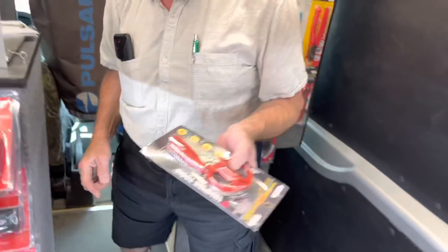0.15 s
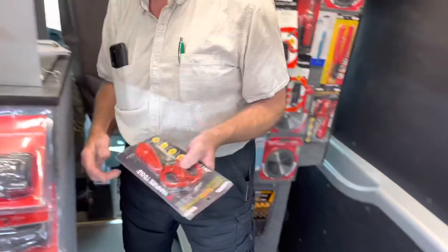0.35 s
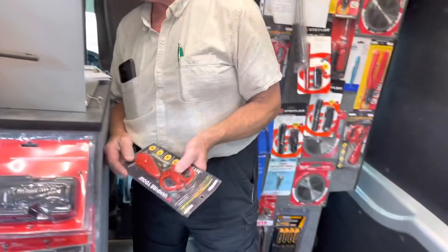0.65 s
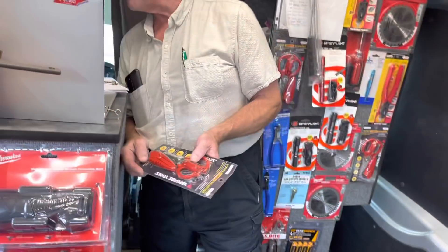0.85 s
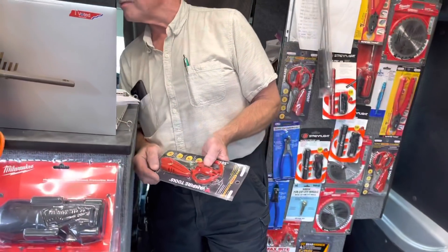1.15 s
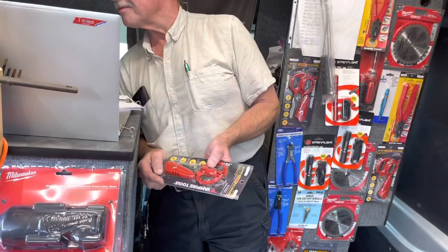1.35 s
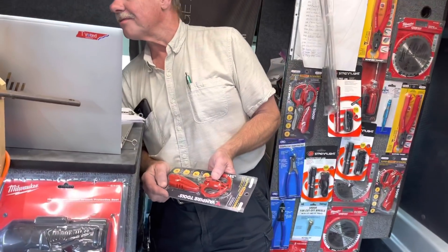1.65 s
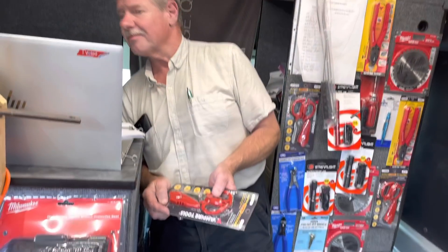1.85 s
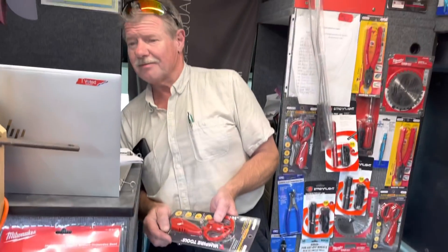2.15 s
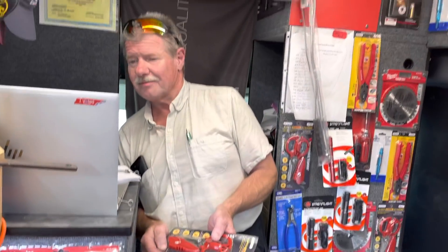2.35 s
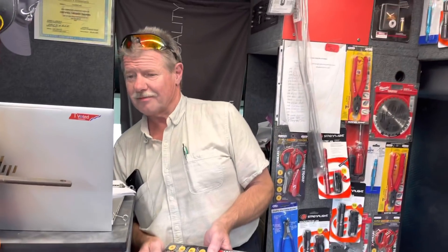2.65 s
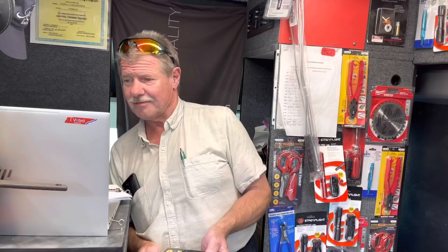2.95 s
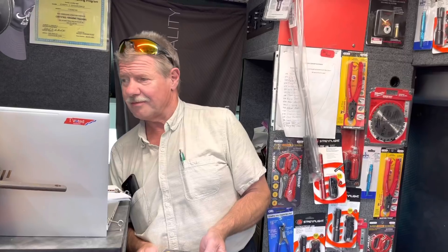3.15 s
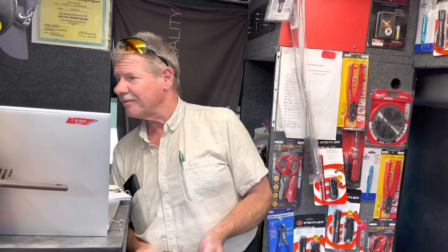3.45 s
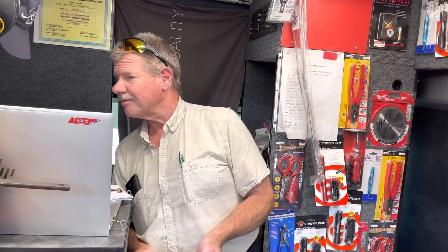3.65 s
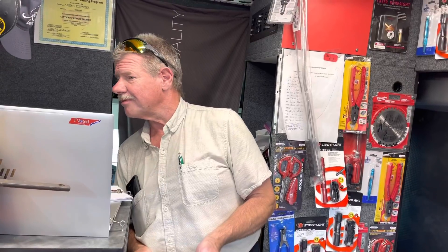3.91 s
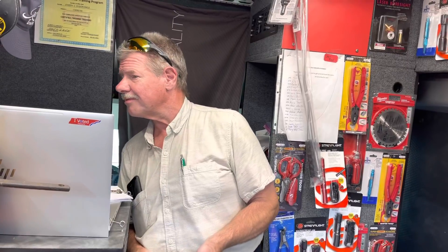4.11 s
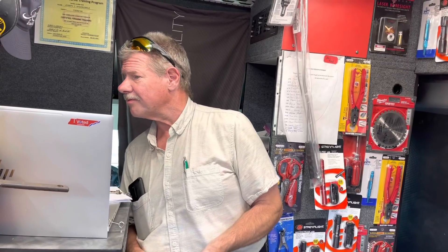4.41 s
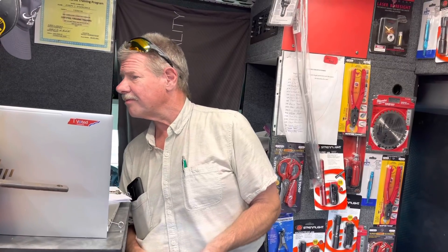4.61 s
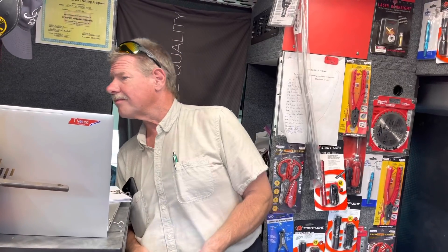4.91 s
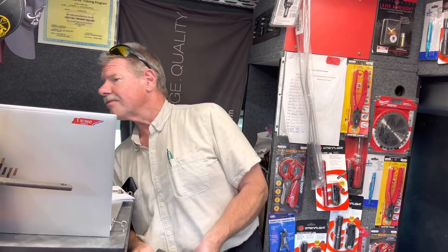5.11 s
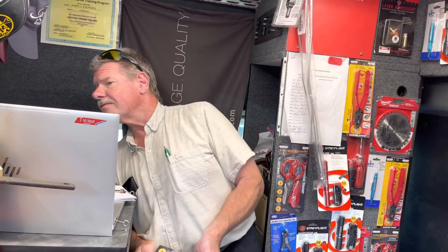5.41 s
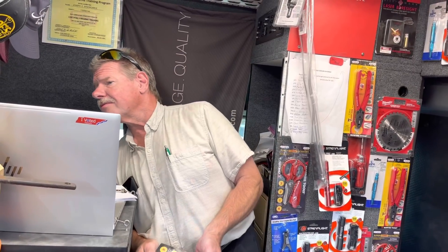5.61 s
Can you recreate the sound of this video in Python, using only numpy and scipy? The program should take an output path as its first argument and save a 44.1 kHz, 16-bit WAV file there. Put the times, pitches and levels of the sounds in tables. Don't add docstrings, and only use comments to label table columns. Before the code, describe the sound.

Low compressor drone with faint whine and boomy blown air in a small cabin; brief plastic snaps and dull knocks early, then mostly steady.

```python
import sys
import numpy as np
from scipy import signal
from scipy.fft import rfft, irfft, next_fast_len
from scipy.io import wavfile
from scipy.ndimage import map_coordinates

SR = 44100
rng = np.random.default_rng(int(sys.argv[2]) if len(sys.argv) > 2 else 0)


def log_audio(samples):
    frames = np.atleast_2d(samples).T
    limited = np.clip(frames, -1, 1)
    pcm = np.round(limited * 32767).astype(np.int16)
    wavfile.write(sys.argv[1], SR, pcm)


def amplitude_ratio(level_db):
    exponent = np.asarray(level_db, float) / 20
    return 10 ** exponent


N = 254456

COMPRESSOR_HZ, FAN_HZ = 57.53, 34.45
MAINS_HZ, MAINS_DB = 60.03, -61.5
BEAT_TOP_S = 0.21
HUM_DB, SWAY_S = -30.5, 0.049
# (time [s], change [dB])
HUM_SWAYS = [(.17, -7.5), (.29, 3.5), (.46, 2), (.64, -5), (.79, -12), (1.08, 4), (1.16, -6), (1.6, -5),
             (1.74, 4.5), (1.86, -2), (2.39, -5.5), (2.58, 3.5), (2.82, -1.5), (3.01, 5.5), (3.32, 3),
             (3.57, -1.5), (3.76, 3.5), (4.0, -1), (4.12, 5.5), (4.23, -4), (4.57, 1.5), (4.68, -10),
             (5.0, 2.5), (5.19, -2)]
# (time [s], pitch [Hz], level [dB])
WHINE_PATH = [(0, 631.8, -53), (1.05, 631.8, -53.5), (1.4, 632.9, -55), (3.2, 632.8, -55),
              (4.3, 632.4, -56.5), (5.77, 632.3, -57.5)]
# (pitch [Hz], level [dB])
SHAFT_TONES = [(27.5, -61.5), (68.9, -55), (103.3, -51.5), (172.4, -60), (206.7, -54.5)]

RUMBLE_DB, DUCT_DB, HISS_DB, SIZZLE_DB, PANEL_DB = -37, -51, -62, -82.5, -43.5
CABIN_HZ, CABIN_WIDTH_HZ, CABIN_DB = 54, 4, -47
TURN_S = 1.5
TURN_DUCT_DB, TURN_HISS_DB, TURN_SIZZLE_DB = -1, 0.5, 12
SIZZLE_TOP_HZ = 9500
# (frequency [Hz], density [dB per Hz])
RUMBLE_COLOUR = [(18, -42.5), (30, -12), (43, -10.5), (53, -1.5), (64, -7.5), (80, 2.5), (98, -6.5),
                 (125, -9.5), (165, -12.5), (205, -10.5), (260, -17.5), (380, -19.5), (520, -26),
                 (900, -30.5)]
# (centre [Hz], width [Hz], level [dB])
DUCT_RESONANCES = [(576, 88, 1), (771.4, 16, 2.5), (951, 71, 2), (1063, 52, 1), (1178, 89, 2),
                   (1304, 75, -0.5), (1397, 67, 2.5), (1600, 640, -3), (1925, 220, -3), (2584, 18, -25),
                   (2843, 39, -9.5), (3840, 40, -18), (5540, 81, -22.5), (6640, 250, -25.5)]
# (frequency [Hz], density [dB per Hz])
HISS_COLOUR = [(900, -40.5), (2200, 3), (3000, -1.5), (4200, -7.5), (6000, -10), (8300, -16), (9600, -22),
               (10200, -21), (10800, -24.5), (11400, -34), (12100, -37.5)]
PANEL_SWING_DB, PANEL_RATE = -0.5, 7.9
SHUDDER_S, BRUSH_S = 0.04, 0.04
# (time [s], extra level [dB])
SHUDDERS = [(.61, 6), (1.03, 9.5), (2.53, 11.5), (2.72, 6), (3.21, 4), (3.62, 7), (4.05, 9), (4.36, 1.5),
            (5.3, 3), (5.54, 7.5)]
# (time [s], extra level [dB])
SLEEVE_BRUSHES = [
    (5.21, 10),
    (5.27, 11),
]

# (frequency [Hz], density [dB per Hz])
EDGE_COLOUR = [(6500, -31), (8200, -11), (9200, -8), (9700, -6), (10200, -6), (10800, -6), (11200, -12),
               (11500, -36)]
# (frequency [Hz], density [dB per Hz])
SHEEN_COLOUR = [(2500, -34), (3800, 4), (5500, 3.5), (6500, 0.5), (8000, -0.5), (9000, -27)]
# (frequency [Hz], density [dB per Hz])
BODY_COLOUR = [(400, -16), (900, -6), (1250, 0), (1700, 0), (2100, -1), (2800, -5), (3600, -17),
               (6000, -32)]
SNAP_RISE_S = 0.0035
STROKE_RISE = 0.52
# (time [s], edge [dB], fall [s], sheen over edge
# [dB], body over edge [dB])
SNAPS = [(0, -61.5, 0.0022, 13, 20.5), (.1075, -80, 0.0063, 4, 31), (0.475, -54.5, 0.014, 1, -1),
         (0.525, -63, 0.0037, 3, 21), (0.535, -61.5, 0.012, 8, 12), (1.313, -68, 0.012, 6, 8),
         (1.325, -72, .008, 3, 1), (4.16, -72, 0.013, -10, -18), (4.519, -64.5, 0.005, -4, -2),
         (4.528, -66, .006, -5, -14), (4.541, -70, .004, -6, -14)]
# (time [s], edge [dB], fall [s], sheen over edge [dB], body over edge [dB])
STROKES = [
    (.3, -78.5, 0.14, 11, 9.5),
    (0.493, -51, 0.02, -1, 5.5),
    (.87, -61.5, 0.1, 1.5, 4.5),
    (5.225, -76.5, 0.07, 9.5, 17.5),
]

KNOCK_PAN_DB = 2
# (time [s], peak [dB], extra for a harder contact [dB per octave])
KNOCKS = [
    (.1063, -20.5, 0),
    (.533, -33, 7),
    (1.243, -31, 4.5),
]
# (pitch [Hz], level [dB], time to fall 60 dB [s])
SHELF_MODES = [(204, -3.5, .1), (280, 3, 0.057), (334, -6.5, 0.033), (550, -13, .07), (1110, -16, .05),
               (1384, -18, .04), (1650, -16, .04), (1880, -23, 0.036)]
SAG, SAG_S, SAG_TOP_HZ = 0.4, 0.014, 450
# (time [s], pitch [Hz], peak [dB], time to fall 60 dB [s])
PINGS = [(.1065, 1470, -50, .045), (.111, 1750, -53, .02), (.469, 10900, -53, .04), (.470, 9000, -49, .04),
         (.475, 1500, -49, .03), (.481, 1650, -48, .04), (.483, 2500, -52, .02), (.487, 9500, -45, .04),
         (.488, 5400, -50, .02), (.491, 10800, -48, .06), (.4915, 2700, -44, .035), (.494, 5450, -46, .03),
         (.494, 7500, -51, .03), (.496, 1320, -46, .04), (.497, 9400, -48, .03), (.504, 1490, -46, .03),
         (.516, 11000, -53, .08), (.5235, 1960, -41, .035), (.531, 5800, -51, .02), (.532, 3400, -48, .03),
         (.5365, 646, -41, .03), (1.312, 9250, -52, .05), (1.313, 8500, -57, .07), (1.317, 6500, -58, .03),
         (1.321, 8950, -53, .07), (1.324, 5700, -57, .03), (4.158, 10850, -60, .06),
         (4.162, 10000, -59, .1), (4.518, 5750, -57, .08), (4.527, 8700, -58, .03), (5.19, 5300, -63, .08),
         (5.239, 2500, -56, .1), (5.25, 3700, -62, .06)]
PING_SPREAD, PING_SPREAD_HZ = 0.05, 190

NEAR = 0.66
# (frequency [Hz], likeness [0-1])
LIKENESS = [(60, 0.99), (250, 0.93), (600, 0.7), (900, 0.5), (1500, 0.29), (3000, 0.91), (5200, 0.25),
            (6200, 0.8), (7200, 0.6), (8000, .7), (8300, 1), (8900, 1), (9300, .9), (10300, .98),
            (11400, .9)]
# (frequency [Hz], left minus right [dB])
LEFT_LOUDER = [(30, -.3), (200, -.1), (350, .5), (650, -1), (1000, 0), (1400, 7), (1750, 3), (2300, 2),
               (5000, 6), (6200, 2.5), (7100, 5.5), (8250, 0), (12000, 0)]
# (frequency [Hz], lead of the left [radians])
LEFT_LEAD = [(0, 0), (350, .2), (700, .8), (1300, 0), (1650, -3), (2300, -4.9), (3050, -4.5), (3700, -5.6),
             (6800, -6.1), (7400, -5.3), (8350, -6.28), (8900, -6.4), (9750, -9), (10000, -9.4),
             (10600, -9.6), (10950, -10.3), (11500, -12.56)]
# (frequency [Hz], extra lead of the left [radians])
HANDS_LEAD = [(1300, 0), (1650, 4.2), (2300, 6), (3050, 5.7), (3700, 6.7), (6500, 7.2), (7400, 6.28),
              (8600, 6.9), (9600, 6.28), (10700, 5.5), (11400, 7.3)]
STOP_S = 0.004


def unit(x):
    return x / np.sqrt(np.mean(x ** 2) + 1e-20)


def along(points, hz):
    f, values = np.transpose(points)
    return np.interp(np.log(hz + 1), np.log(f + 1), values)


def curves(rows):
    times, *columns = np.transpose(rows)
    return [np.interp(np.arange(N) / SR, times, column) for column in columns]


def swells(rows, half_s):
    t = np.arange(N) / SR
    return sum(db * np.exp(-((t - s) / half_s) ** 2) for s, db in rows)


def wobble(rate):
    knots = rng.standard_normal(8000)
    return map_coordinates(knots, [np.arange(N) * rate / SR], mode="wrap")


def filtered(x, response):
    size = next_fast_len(N + SR // 2)
    spectrum = rfft(x, size) * response(np.fft.rfftfreq(size, 1 / SR))
    return irfft(spectrum, size)[..., :N]


def shaped(colour):
    closed = [(colour[0][0] / 2, -120), *colour, (colour[-1][0] * 2, -70)]
    return lambda hz: amplitude_ratio(along(closed, hz))


def tone(hz, drift=0):
    phase = 2 * np.pi * np.cumsum(np.broadcast_to(hz, N)) / SR
    return np.sqrt(2) * np.sin(phase + drift)


def rush(gain, least=0):
    def middle_and_side(hz):
        turn = np.arccos(np.clip(along(LIKENESS, hz), least, 1)) / 2
        return gain(hz) * np.array([np.cos(turn), np.sin(turn)])
    mid, side = filtered(rng.standard_normal((2, N)), middle_and_side)
    return unit(np.array([mid + side, mid - side]))


def machine():
    hum_db = HUM_DB + swells(HUM_SWAYS, SWAY_S)
    whine_hz, whine_db = curves(WHINE_PATH)
    hum = amplitude_ratio(hum_db) * tone(COMPRESSOR_HZ, 0.25 * wobble(2.1))
    mains_start = 2 * np.pi * (COMPRESSOR_HZ - MAINS_HZ) * BEAT_TOP_S
    mains = amplitude_ratio(MAINS_DB) * tone(MAINS_HZ, mains_start)
    fan = amplitude_ratio(-41.0 + 0.38 * wobble(4.5)) * tone(FAN_HZ, 0.08 * wobble(3.2))
    whine = amplitude_ratio(whine_db + 0.18 * wobble(15)) * tone(whine_hz, 0.1 * wobble(5.3))
    lines = sum(amplitude_ratio(db) * tone(hz, 0.051 * wobble(0.66)) for hz, db in SHAFT_TONES)
    return hum + mains + fan + lines + whine * amplitude_ratio([[-0.7], [0.7]])


def air():
    facing = np.exp(-np.arange(N) / SR / TURN_S)

    def duct(hz):
        return np.sqrt(sum(amplitude_ratio(db) ** 2 / (1 + (2 * (hz - centre) / width) ** 4)
                           for centre, width, db in DUCT_RESONANCES))

    def panel(hz):
        return 1 / (1 + ((hz - 119) / 25) ** 4)

    def cabin_mode(hz):
        return 1 / (1 + ((hz - CABIN_HZ) / CABIN_WIDTH_HZ) ** 2)

    def sizzle_colour(hz):
        return shaped(EDGE_COLOUR)(hz) / (1 + (hz / SIZZLE_TOP_HZ) ** 20)

    panel_db = PANEL_DB + swells(SHUDDERS, SHUDDER_S) + PANEL_SWING_DB * wobble(PANEL_RATE)
    sizzle_db = SIZZLE_DB + TURN_SIZZLE_DB * facing + swells(SLEEVE_BRUSHES, BRUSH_S)
    rumble = amplitude_ratio(RUMBLE_DB + 0.65 * wobble(3.56)) * rush(shaped(RUMBLE_COLOUR))
    stream = amplitude_ratio(DUCT_DB + TURN_DUCT_DB * facing + 0.25 * wobble(4.3)) * rush(duct)
    panels = amplitude_ratio(panel_db) * rush(panel)
    cabin = amplitude_ratio(CABIN_DB) * rush(cabin_mode)
    sizzle = amplitude_ratio(sizzle_db) * rush(sizzle_colour)
    hiss = amplitude_ratio(HISS_DB + TURN_HISS_DB * facing + 0.6 * wobble(8)) * rush(shaped(HISS_COLOUR))
    return rumble + cabin + panels + stream + sizzle + hiss


def rustles():
    t = np.arange(N) / SR
    grain = np.array([wobble(700), wobble(500), wobble(350)])
    layers = np.zeros((3, N))
    moves = [(SNAP_RISE_S, *row) for row in SNAPS]
    moves += [(STROKE_RISE * row[2], *row) for row in STROKES]
    for rise, s, db, fall, sheen_db, body_db in moves:
        fade = np.where(t < s, ((t - s) / rise) ** 2, np.abs((t - s) / fall) ** 1.6)
        crackle = amplitude_ratio(grain * 3 / (1 + fall / 0.03))
        tail = amplitude_ratio(-19 - 60 * np.abs(t - s) / 0.32) * (t > s)
        level = amplitude_ratio(db + np.array([[0], [sheen_db], [body_db]]))
        layers += level * (np.exp(-fade) * crackle + tail)
    colours = (EDGE_COLOUR, SHEEN_COLOUR, BODY_COLOUR)
    return sum(level * rush(shaped(colour), NEAR) for level, colour in zip(layers, colours))


def knocks():
    out, t = np.zeros(N + SR), np.arange(SR // 4) / SR
    sharp = SAG * SAG_S * (1 - np.exp(-t / SAG_S))
    spread = rng.normal(0, 1, (len(KNOCKS), len(SHELF_MODES)))
    for (s, db, hard_db), row in zip(KNOCKS, spread):
        ring = np.zeros(len(t))
        for (hz, level, t60), extra_db in zip(SHELF_MODES, row):
            contact_db = hard_db * min(np.log2(hz / 320), 1.5)
            swing = np.sin(2 * np.pi * hz * (t + sharp * (hz < SAG_TOP_HZ)))
            ring += amplitude_ratio(level + extra_db + contact_db - 60 * t / t60) * swing
        out[round(s * SR):][:len(t)] += amplitude_ratio(db - 3) * ring * (1 - np.exp(-t / 0.003))
    return out[:N] * amplitude_ratio([[KNOCK_PAN_DB], [-KNOCK_PAN_DB]])


def pings():
    out, t = np.zeros(N + SR), np.arange(SR // 8) / SR
    scatter = rng.uniform(-0.8, 1, (len(PINGS), 6, 1))
    for (s, hz, db, t60), row in zip(PINGS, scatter):
        modes_hz = hz + min(PING_SPREAD * hz, PING_SPREAD_HZ) * row
        ring = np.sin(2 * np.pi * modes_hz * t).sum(0) / 2
        out[round(s * SR):][:len(t)] += amplitude_ratio(db - 60 * t / t60) * ring * (1 - np.exp(-t / 0.0021))
    return out[:N]


def scene():
    def hands_side(hz):
        lead = np.interp(hz, *np.transpose(HANDS_LEAD))
        return np.exp(0.5j * lead * [[1], [-1]])
    return machine() + air() + filtered(rustles() + knocks() + pings(), hands_side)


def roll_off(x):
    return signal.sosfilt(signal.butter(12, 12090, fs=SR, output="sos"), x)


def record(dry):
    def ports(hz):
        lead = np.interp(hz, *np.transpose(LEFT_LEAD))
        half = amplitude_ratio(along(LEFT_LOUDER, hz) / 2) * np.exp(0.5j * lead)
        return np.array([half, 1 / half])
    closing = np.minimum(1, np.arange(N)[::-1] / SR / STOP_S)
    return roll_off(filtered(dry, ports) * closing)


dry = scene()
out = record(dry)
log_audio(out)
```